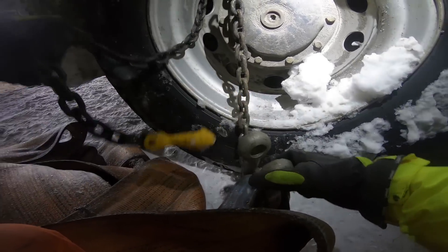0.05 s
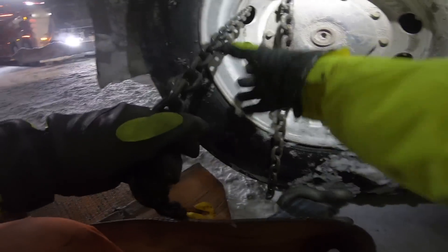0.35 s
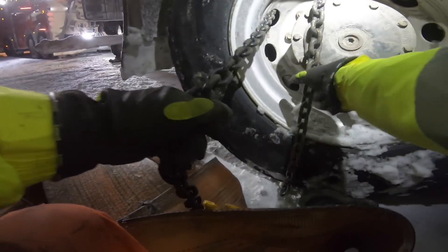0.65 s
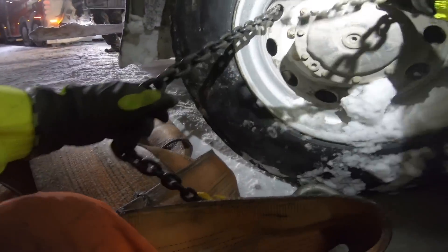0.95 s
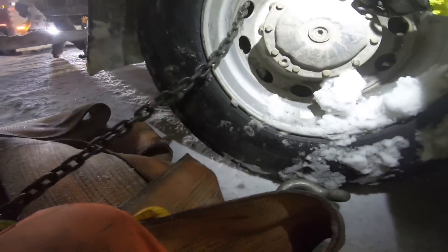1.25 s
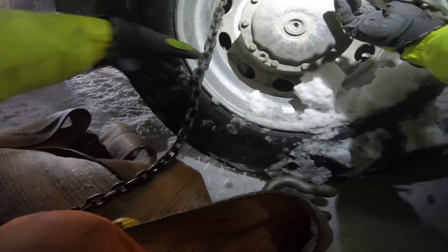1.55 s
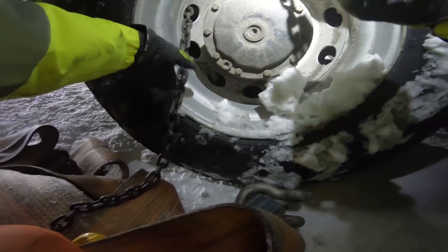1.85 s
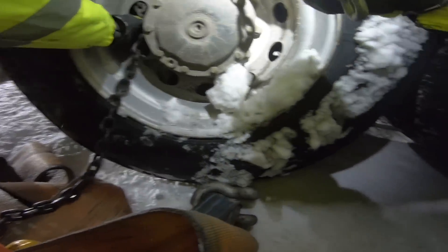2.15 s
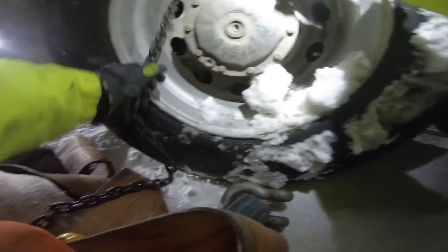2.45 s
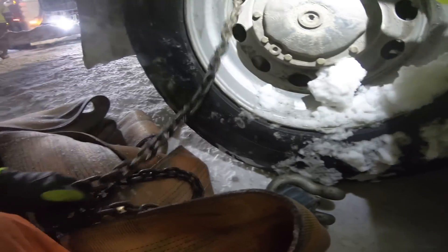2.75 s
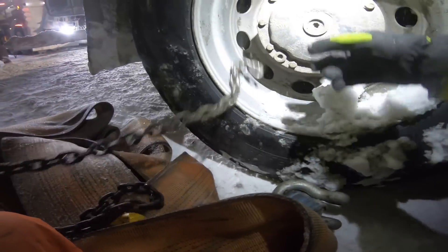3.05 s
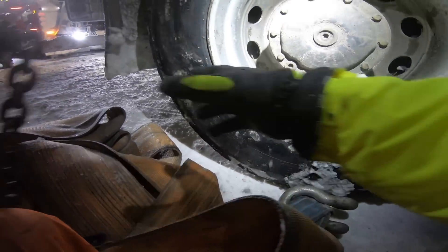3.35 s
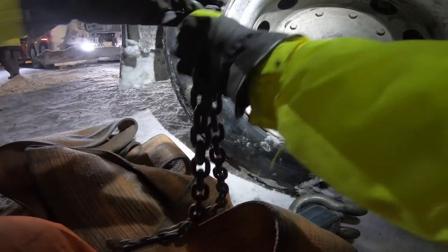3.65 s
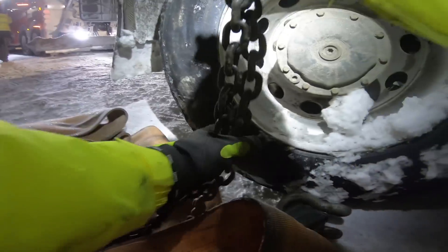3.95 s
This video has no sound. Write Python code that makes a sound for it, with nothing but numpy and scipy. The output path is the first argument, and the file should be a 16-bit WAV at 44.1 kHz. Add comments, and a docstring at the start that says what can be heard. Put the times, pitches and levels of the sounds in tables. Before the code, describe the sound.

Close up in the open air, chain links tap lightly as a sleeve swishes, then rattle and clash over a truck's wheel rim twice, the second pull ringing hollow. A diesel idles under a low, gusty rumble.

```python
"""A low, gusty rumble and an idling diesel, outdoors; a sleeve swishes and single steel links tap.
Slack chain and gloves thud on tyre and straps. Close by, the chain is hauled through the holes of a
truck wheel in two long pulls: links jingle, clash and knock on the rim, and in the second pull the
taut chain sets the wheel's dish booming. The image narrows to almost mono during the first pull."""
import sys
import numpy as np
from scipy import signal
from scipy.fft import rfft, irfft, next_fast_len
from scipy.io import wavfile
from scipy.ndimage import map_coordinates

SR = 44100
rng = np.random.default_rng(int(sys.argv[2]) if len(sys.argv) > 2 else 0)


def store_wav(level_fs):
    """Save 16-bit WAV to argv[1]."""
    pcm = np.round(np.clip(np.atleast_2d(level_fs), -1, 1) * 32767)
    wavfile.write(sys.argv[1], SR, pcm.T.astype(np.int16))


N = 176400

# rumble envelope: time_s, level_db
RUMBLE_LEVEL = [(0,-23.5),(.38,-21.5),(.8,-24.5),(1.15,-31.5),(2.1,-29),(2.6,-36.5),(3,-44),(3.35,-37)]
# rumble spectrum: freq_hz, gain_db
RUMBLE_EQ = [(26,-6.5),(48,-1),(78,2.5),(140,0.5),(900,-63.5)]
# engine drone envelope: time_s, level_db
ENGINE_LEVEL = [(.4,-30.5),(1,-34),(2.5,-31),(2.9,-38),(4,-40.5)]
# engine drone spectrum: freq_hz, gain_db
ENGINE_EQ = [(60,-20),(150,5.5),(310,0.5),(380,-6),(700,-15),(4000,-48),(10000,-53)]
# engine tones: pitch_hz, mean_level_db
ENGINE_TONES = [(28.2,-41.5),(112.8,-40.5),(302,-43.5)]
# cloth rub envelope: time_s, level_db
SLEEVE_LEVEL = [(.25,-43.5),(.3,-34),(.41,-37.5),(.5,-47.5),(.65,-43),(.76,-51.5),(2.6,-53)]
# cloth rub spectrum: freq_hz, gain_db
SLEEVE_EQ = [(600,0),(1900,1),(3200,-6),(6300,-6),(9000,-21),(15500,-49)]

# single links touching: start_s, ring_rel_db, knock_rel_db
TAP_EVENTS = [(.025,-24,-26),(0.115,-20,-23.5),(.209,-36,-32),(0.283,-25.5,-27.5),(.376,-51,-35),(.698,-35.5,-51),(.825,-33.5,-30.5),(1.492,-48,-35.5),(1.542,-26.5,-25),(1.788,-30,-65),(2.024,-25,-33),(2.046,-31.5,-30),(2.71,-34,-26),(2.732,-19,-23.5),(2.955,-25.5,-27.5),(3.066,-24,-27),(3.151,-21,-41),(3.208,-21.5,-30),(3.23,-21,-37),(3.442,-31.5,-59),(3.563,-25,-41),(3.578,-32,-69),(3.679,-29,-40),(3.719,-30.5,-61),(3.86,-25,-40)]
# modes of a link: pitch_hz, gain_db, t60_s
LINK_MODES = [(3700,-2,0.045),(3880,-3,0.03),(4200,-7,0.045),(4620,5.5,0.05),(4880,11,0.034),(5190,4,0.03),(5480,-1,0.04),(6430,-1,0.04)]
# link ring filter: freq_hz, gain_db
LINK_EQ = [(1500,-33),(3200,-6),(3750,6.5),(4750,4),(5600,3.5),(7500,-1.5),(12000,-28.5)]
# modes of the rim, damped by its tyre: pitch_hz, gain_db, t60_s
RIM_MODES = [(1014,-2.5,0.029),(2057,3.5,0.014),(2874,5,0.017),(3270,-5,0.022)]
# rim knock filter: freq_hz, gain_db
RIM_EQ = [(150,-5),(520,2.5),(1100,2),(1550,-6),(3100,0.5),(7000,-43.5)]
# steel-on-steel sizzle against link ring, before filtering: time_s, gain_db
SIZZLE_GAIN = [(0,-24),(1.55,-17),(1.85,6),(2.05,-21),(2.48,-17),(2.63,-8)]
# sizzle filter: freq_hz, gain_db
SIZZLE_EQ = [(11000,-61),(12000,-4),(14800,-10.5),(15600,9),(16000,-15)]
# blows on tyre and straps: start_s, level_db, pitch_hz
THUD_EVENTS = [(0.159,-17.5,215),(0.218,-18.5,210),(1.413,-14.5,178),(2.449,-18,285),(2.816,-23,215),(3.12,-24,230),(3.192,-22,260)]
# jingle envelope, before filtering: time_s, level_db
JINGLE_LEVEL = [(.94,-55),(.985,-25),(1.2,-26.5),(1.25,-31.5),(1.39,-52),(2.27,-52.5),(2.33,-26.5),(2.6,-23.5),(2.69,-35),(2.8,-26),(2.89,-36.5),(3.21,-35.5),(3.28,-48),(3.56,-46),(3.65,-37),(3.78,-45)]
# bunches of links running over the rim: start_s, ring_rel_db, knock_rel_db, rebound_s
CLASH_EVENTS = [(0.9734,-10.5,-29,0.0038),(1.028,-11,-15,0.013),(1.06,-20,-24,0.0032),(1.089,-12,-17,0.0019),(1.102,-11.5,-43,0.0042),(1.181,-14,-18.5,0.01),(1.204,-12.5,-16.5,0.0078),(1.296,-19.5,-23.5,0.011),(1.31,-16,-25,0.0049),(2.2909,-15,-25.5,0.003),(2.354,-9.5,-20.5,0.0064),(2.372,-14,-20,0.0057),(2.409,-11,-16.5,0.013),(2.433,-5.5,-20.5,0.0035),(2.4522,-10.5,-16.5,0.0067),(2.486,-16,-18,0.0065),(2.495,-11,-27,0.004),(2.527,-9,-16.5,0.02),(2.571,-9,-17,0.011),(2.593,-7,-21,0.025),(2.612,-9.5,-20,0.0047),(2.634,-9.5,-30,0.0014),(2.6641,-11.5,-29.5,0.0072),(2.766,-19,-20,0.016),(2.803,-12,-14.5,0.018),(2.821,-11,-20.5,0.0055),(2.8375,-9,-24,0.0031),(2.9779,-18.5,-27,0.0019),(2.9988,-15,-23.5,0.0091),(3.074,-17.5,-19,0.005),(3.096,-8,-16.5,0.015),(3.103,-10,-24,0.0076)]
# hollow modes of the wheel's dish: pitch_hz, gain_db, t60_s
DISH_MODES = [(473,-10,0.07),(617,6,0.038),(810,-2.5,0.027)]

# stereo width: time_s, side_rel_db
SIDE_GAIN = [(.85,5),(1,1.5),(1.2,-5.5),(1.45,-25)]
# tone of the narrow image: freq_hz, gain_db
NARROW_EQ = [(5600,0.5),(7500,-8),(11000,-8),(12000,0)]

CONTACTS_PER_S, CONTACT_SCATTER_DB = 1700, 5.5
WHEEL_WIDTH = 0.31
TIME_S = np.arange(N) / SR
RING_TIME_S = TIME_S[:SR // 5]


def amp(db):
    return 10 ** (np.asarray(db) / 20)


def unit_rms(x):
    return x / np.sqrt(np.mean(x ** 2) + 1e-20)


def unit_energy(x):
    return x / np.sqrt(np.sum(x ** 2) + 1e-20)


def curve(points):
    return np.interp(TIME_S, *np.transpose(points))


def wobble(knots_per_s):
    return map_coordinates(rng.standard_normal(400), [TIME_S * knots_per_s], mode="wrap")


def add(track, start_s, x):
    i = max(0, round(start_s * SR))
    track[..., i:i + x.shape[-1]] += x[..., :N - i]


def equalise(x, eq):
    """Minimum-phase filter through (freq_hz, gain_db) points."""
    size = 2 * next_fast_len(N // 2 + 8192)
    freq_hz, gain_db = np.transpose(eq)
    bin_db = np.interp(np.log(np.fft.rfftfreq(size, 1 / SR) + 1), np.log(freq_hz), gain_db)
    cepstrum = irfft(np.log(amp(bin_db)))
    cepstrum[1:size // 2] *= 2
    cepstrum[size // 2 + 1:] = 0
    return irfft(rfft(x, size) * np.exp(rfft(cepstrum)), size)[..., :N]


def stereo(mid, side, width):
    return np.array([mid + width * side, mid - width * side])


def noise(eq, width):
    return unit_rms(equalise(stereo(*rng.standard_normal((2, N)), width), eq))


def burst(t60_s):
    return unit_energy(rng.standard_normal(len(RING_TIME_S)) * amp(-60 * RING_TIME_S / t60_s))


def impacts(samples, per_s, scatter_db):
    """Random impulses of uneven strength and sign."""
    strength = amp(scatter_db * np.clip(rng.standard_normal(samples), -2, 2))
    return (rng.random(samples) < per_s / SR) * strength * rng.choice([-1, 1], samples)


def rumble():
    """Low noise swelling in gusts."""
    return amp(curve(RUMBLE_LEVEL)) * noise(RUMBLE_EQ, width=0.17)


def diesel(drift_rad=0.5, flutter_db=0.17):
    """Idling engine: noise drone plus slightly unsteady tones."""
    level_db = curve(ENGINE_LEVEL)
    hum = sum(amp(db) * np.sqrt(2) * np.sin(2 * np.pi * hz * TIME_S + drift_rad * wobble(3.77))
              for hz, db in ENGINE_TONES)
    drone = amp(level_db + flutter_db * wobble(11)) * noise(ENGINE_EQ, width=0.21)
    return drone + amp(level_db - level_db.mean()) * hum


def sleeve(flutter_db=2):
    """Jacket cloth rubs as the arms move."""
    return amp(curve(SLEEVE_LEVEL) + flutter_db * wobble(60.7)) * noise(SLEEVE_EQ, width=0.84)


def struck_steel(modes, spread, crack_db, crack_t60_s, width):
    """A noise crack plus decaying modes, reweighted and detuned per call."""
    hz, db, t60_s = np.transpose(modes)[:, :, None]
    detune, weight, phase = rng.standard_normal((3, len(modes), 1))
    decay = amp(db + 0.8 * weight - 60 * RING_TIME_S / t60_s)
    cycles = hz * (1 + spread * detune) * RING_TIME_S + phase
    ring = unit_energy((decay * np.sin(2 * np.pi * cycles)).sum(0))
    mid = unit_energy(ring + amp(crack_db) * burst(crack_t60_s))
    return stereo(mid, burst(crack_t60_s), width)


def contact(t60_scale=1, sizzle_t60_s=0.044):
    """One contact excites three stereo parts: link ring, rim knock, sizzle."""
    scale = np.array([1, 1, t60_scale])
    ring = struck_steel(LINK_MODES * scale, spread=0.018, crack_db=8.5, crack_t60_s=0.014, width=0.65)
    knock = struck_steel(RIM_MODES * scale, spread=0.02, crack_db=11.5, crack_t60_s=0.037,
                         width=WHEEL_WIDTH)
    sizzle = stereo(burst(sizzle_t60_s), burst(sizzle_t60_s), width=1)
    return np.array([ring, knock, sizzle])


def collision(ring_db, knock_db, rebound_s, t60_scale=1):
    """A first blow, then neighbouring links rebound ever more weakly."""
    t = TIME_S[:SR // 16]
    blows = impacts(len(t), CONTACTS_PER_S, CONTACT_SCATTER_DB) * np.exp(-(t / rebound_s) ** 2 / 2)
    blows[0] = 1.24
    parts = signal.fftconvolve(contact(t60_scale), blows[None, None], axes=2)
    return np.array([amp(db) * unit_energy(p) for db, p in zip((ring_db, knock_db, ring_db), parts)])


def taps(ring_gain_db=22.5, knock_gain_db=31.5):
    """Single links touch; a glove halves the ring time."""
    parts = np.zeros((3, 2, N))
    for start_s, ring_db, knock_db in TAP_EVENTS:
        tap = collision(ring_db + ring_gain_db, knock_db + knock_gain_db, rebound_s=0.0035, t60_scale=0.5)
        add(parts, start_s, tap)
    return parts


def thuds(rise_s=0.0061, scuff_gain=0.4):
    """Slack chain and gloves hit tyre and straps; each blow dies within a few cycles."""
    track, t = np.zeros(N), TIME_S[:SR // 10]
    envelope = t / rise_s * np.exp(1 - t / rise_s)
    for start_s, db, hz in THUD_EVENTS:
        lowpass = signal.butter(4, 2 * hz, fs=SR, output="sos")
        scuff = unit_rms(signal.sosfilt(lowpass, rng.standard_normal(len(t))))
        add(track, start_s, amp(db) * envelope * (np.sin(2 * np.pi * hz * t) + scuff_gain * scuff))
    return track


def jingle(links=12, peak_contacts_per_s=2600):
    """Loose links chatter; a harder pull gives denser contacts and more rim knock."""
    ring_db = curve(JINGLE_LEVEL)
    pull_db = ring_db - ring_db.max()
    knock_db = ring_db.max() - 1 + 1.406 * pull_db
    density = amp(0.95 * pull_db)
    parts = np.zeros((3, 2, N))
    for _ in range(links):
        response = contact()
        chatter = impacts(N, peak_contacts_per_s * density / links, scatter_db=4.5) / np.sqrt(density)
        parts += signal.oaconvolve(response, chatter[None, None], axes=2)[..., :N]
    return np.array([amp(db) * unit_rms(p) for db, p in zip((ring_db, knock_db, ring_db), parts)])


def clashes(ring_gain_db=23, knock_gain_db=31):
    """Bunches of links run over the rim."""
    parts = np.zeros((3, 2, N))
    for start_s, ring_db, knock_db, rebound_s in CLASH_EVENTS:
        add(parts, start_s, collision(ring_db + ring_gain_db, knock_db + knock_gain_db, rebound_s))
    return parts


def dish_boom(peak_s=2.452, sigma_s=0.099, level_db=-28.5):
    """Taut links bump over the edge of a hole and ring the wheel's dish."""
    t = RING_TIME_S
    ring = sum(amp(db - 60 * t / t60_s) * np.sin(2 * np.pi * hz * t) for hz, db, t60_s in DISH_MODES)
    mid = signal.oaconvolve(impacts(N, CONTACTS_PER_S, CONTACT_SCATTER_DB), ring)[:N]
    side = signal.oaconvolve(impacts(N, CONTACTS_PER_S, CONTACT_SCATTER_DB), ring)[:N]
    swell = np.exp(-((TIME_S - peak_s) / sigma_s) ** 2 / 2)
    return amp(level_db) * swell * unit_rms(stereo(mid, side, WHEEL_WIDTH))


def scene():
    """All sources close and dry, in open air."""
    ring, knock, sizzle = jingle() + clashes() + taps()
    pan_left = amp([[2], [-2]])
    sizzle = equalise(sizzle, SIZZLE_EQ) * amp(curve(SIZZLE_GAIN)) * pan_left
    chain = equalise(ring, LINK_EQ) + equalise(knock, RIM_EQ) + sizzle
    return chain + dish_boom() + thuds() + sleeve() + diesel() + rumble()


def record(dry, wide_above_hz=9800, cutoff_hz=15950):
    """The image narrows to almost mono and dulls, except in the top treble; then a band limit."""
    size = next_fast_len(N + SR // 2)
    hz = np.fft.rfftfreq(size, 1 / SR)
    mid, side = (dry[0] + dry[1]) / 2, (dry[0] - dry[1]) / 2
    side_db = curve(SIDE_GAIN)
    narrowing = np.clip(side_db / side_db.min(), 0, 1)
    mid = mid + narrowing * (equalise(mid, NARROW_EQ) - mid)
    side_spectrum = np.where(hz < wide_above_hz, rfft(side * amp(side_db), size), rfft(side, size))
    spectrum = stereo(rfft(mid, size), side_spectrum, width=0.74)
    return irfft(spectrum * (hz < cutoff_hz), size)[:, :N]


dry = scene()
out = record(dry)
store_wav(out)
```